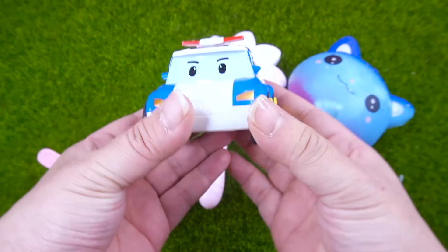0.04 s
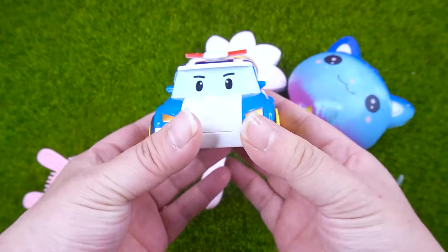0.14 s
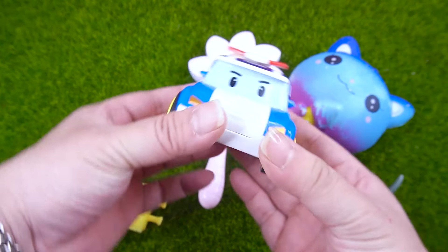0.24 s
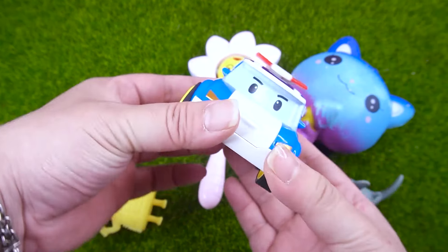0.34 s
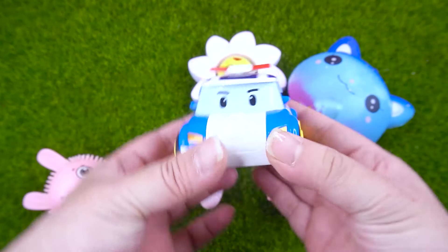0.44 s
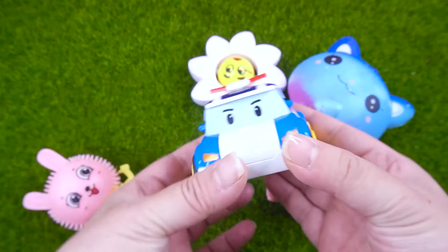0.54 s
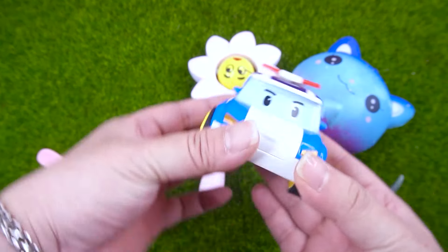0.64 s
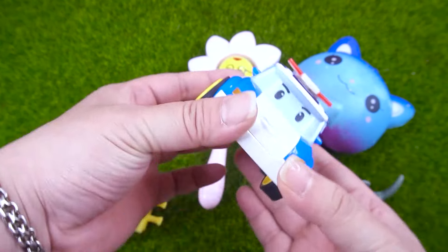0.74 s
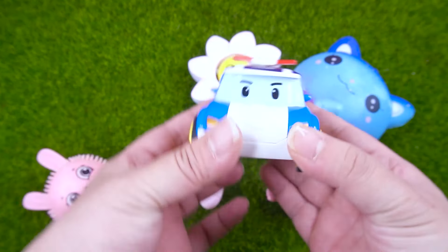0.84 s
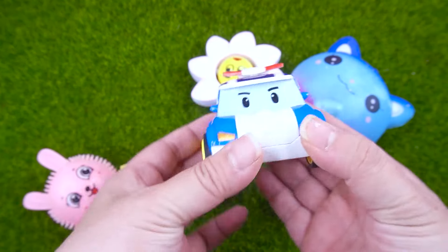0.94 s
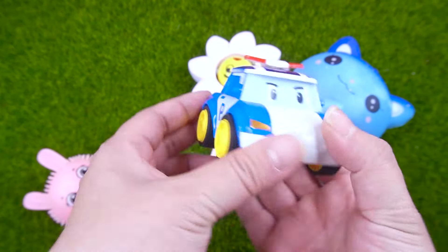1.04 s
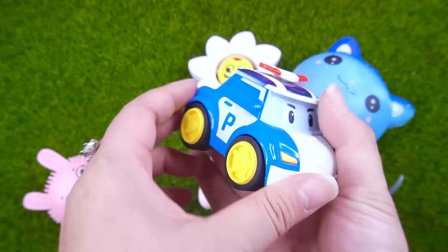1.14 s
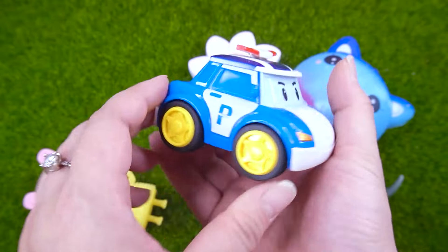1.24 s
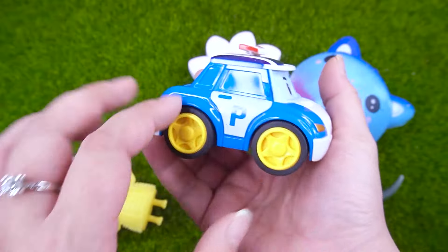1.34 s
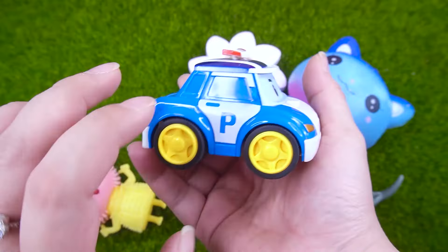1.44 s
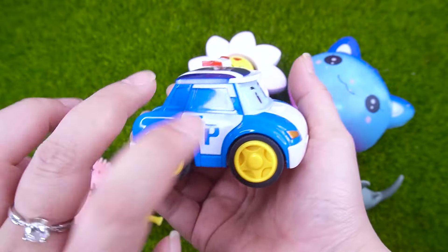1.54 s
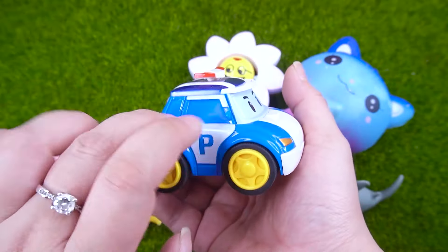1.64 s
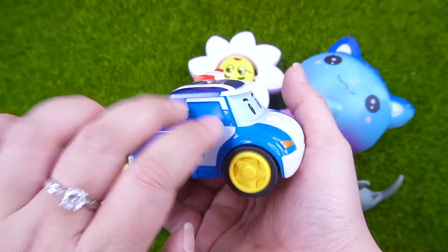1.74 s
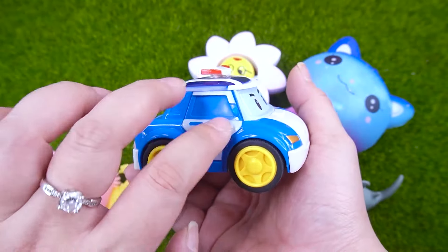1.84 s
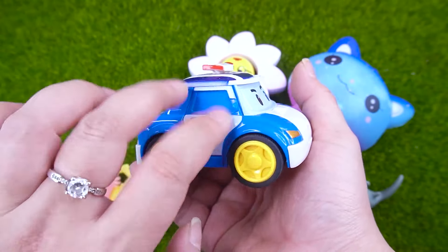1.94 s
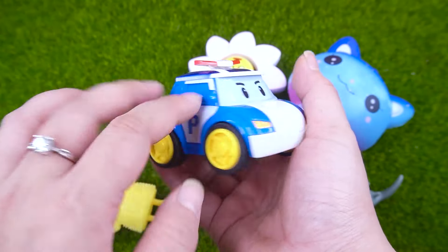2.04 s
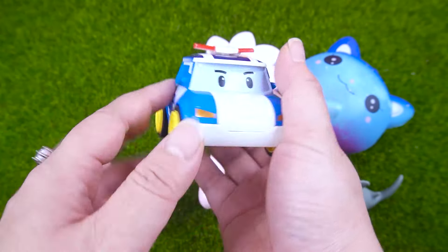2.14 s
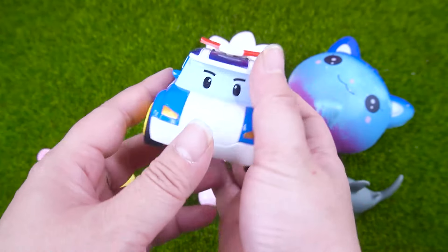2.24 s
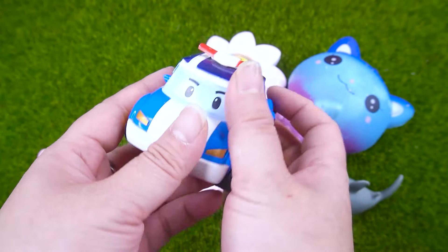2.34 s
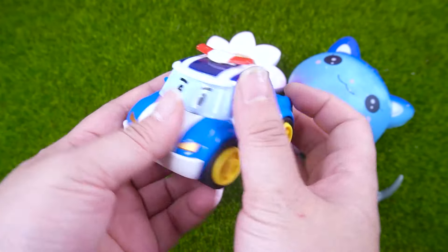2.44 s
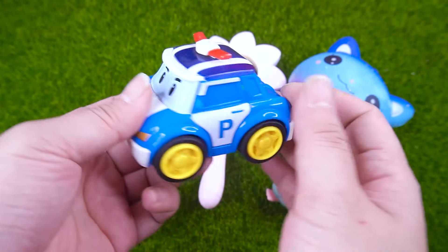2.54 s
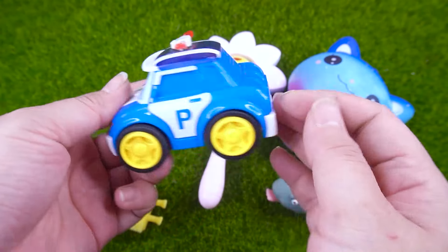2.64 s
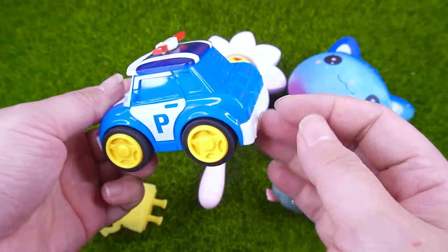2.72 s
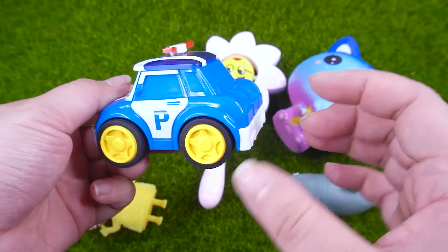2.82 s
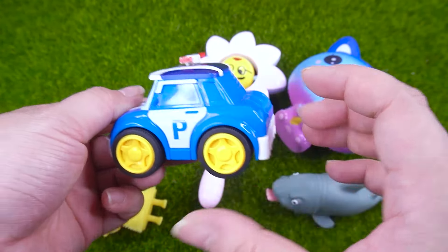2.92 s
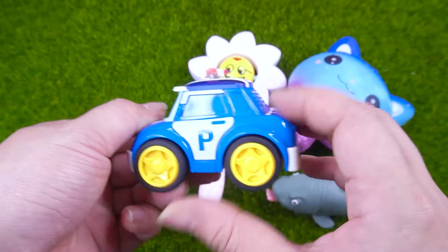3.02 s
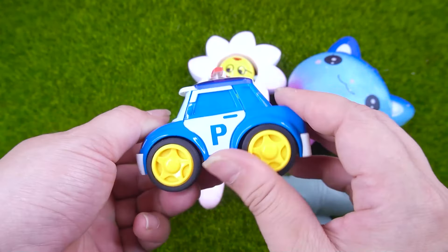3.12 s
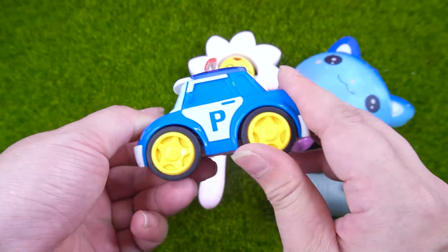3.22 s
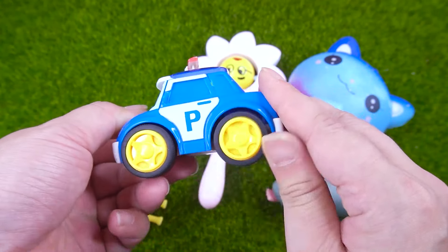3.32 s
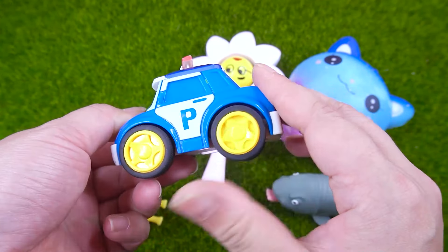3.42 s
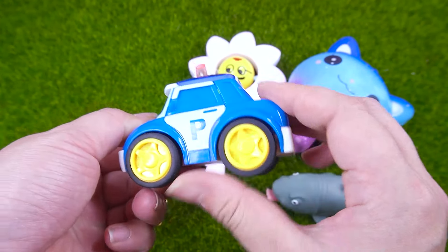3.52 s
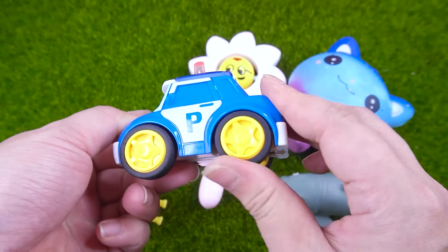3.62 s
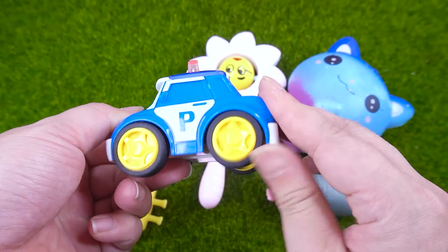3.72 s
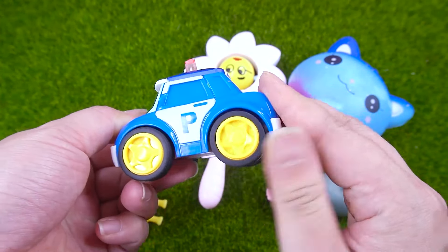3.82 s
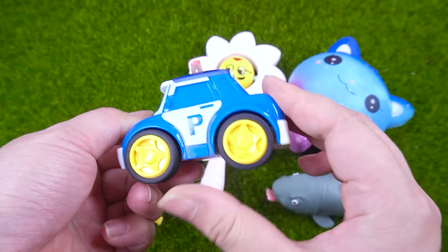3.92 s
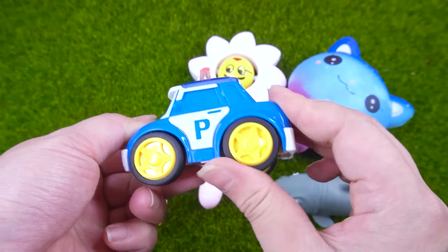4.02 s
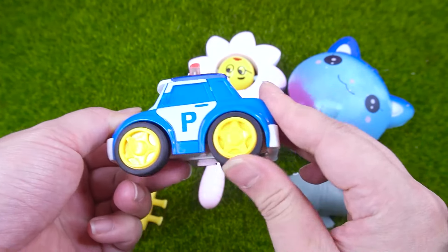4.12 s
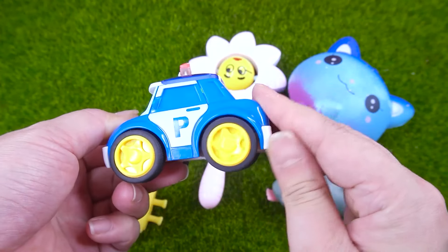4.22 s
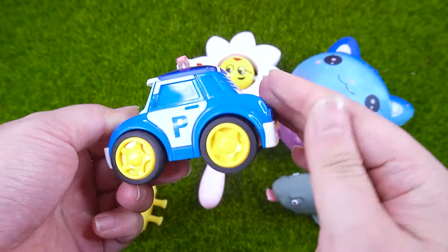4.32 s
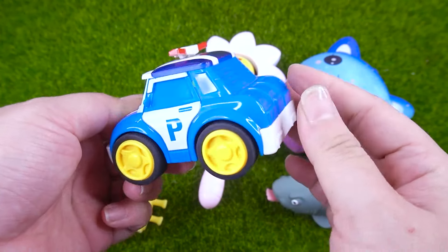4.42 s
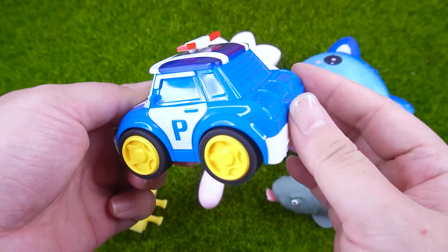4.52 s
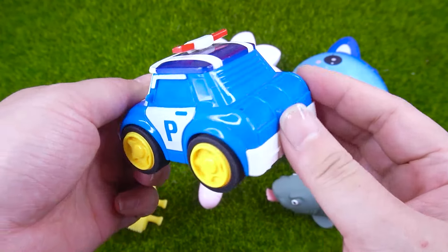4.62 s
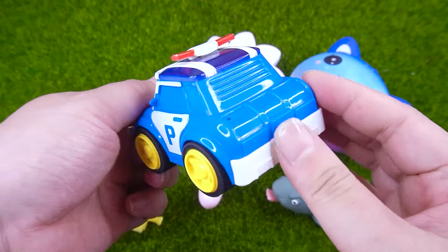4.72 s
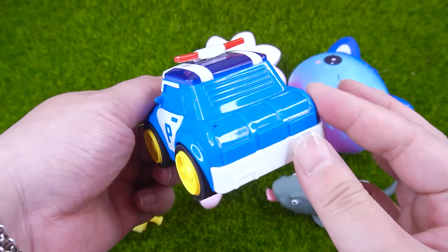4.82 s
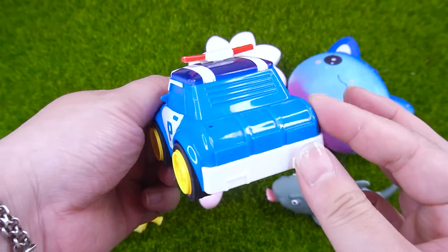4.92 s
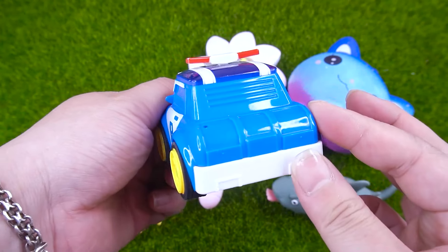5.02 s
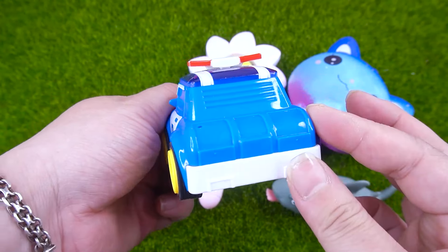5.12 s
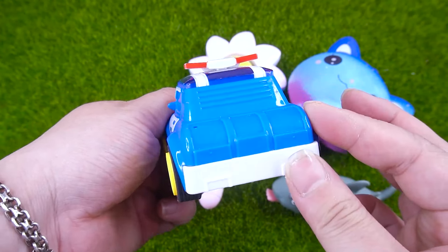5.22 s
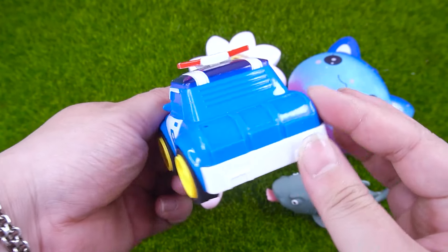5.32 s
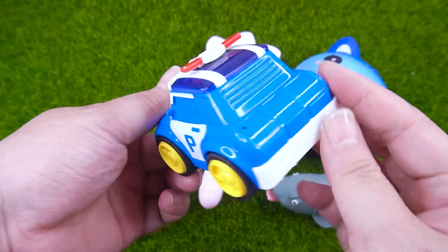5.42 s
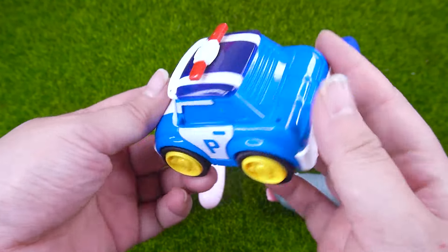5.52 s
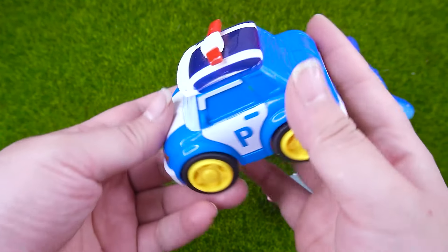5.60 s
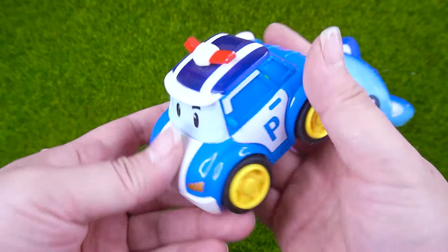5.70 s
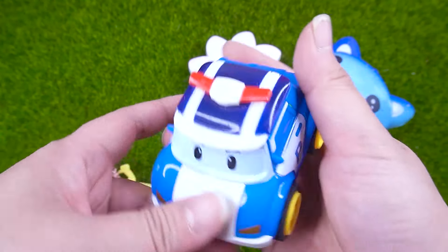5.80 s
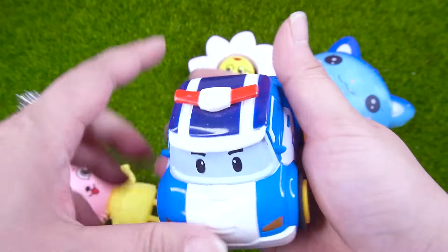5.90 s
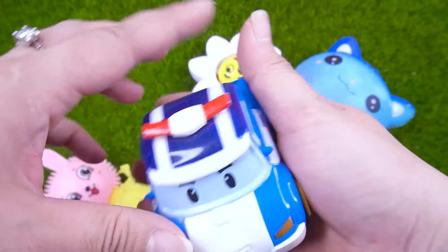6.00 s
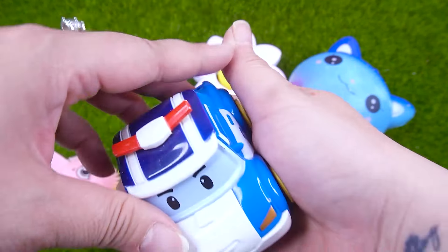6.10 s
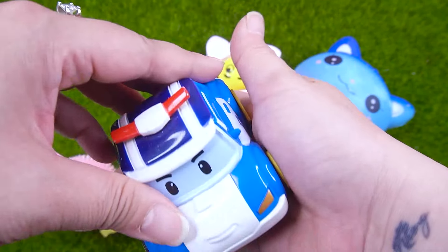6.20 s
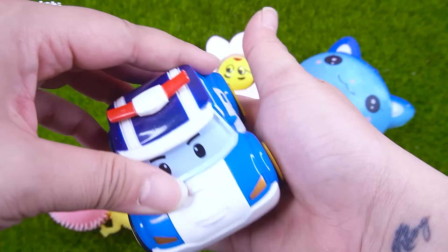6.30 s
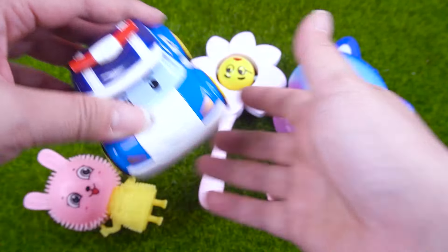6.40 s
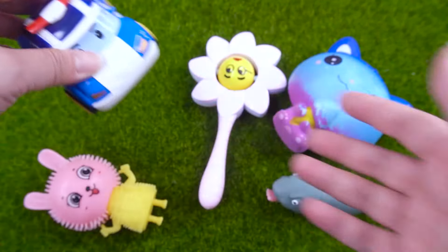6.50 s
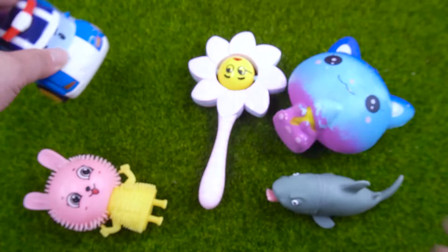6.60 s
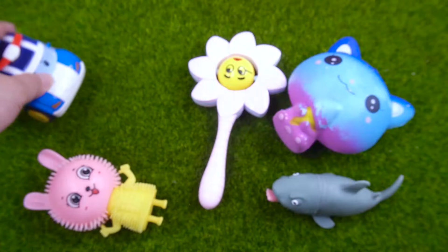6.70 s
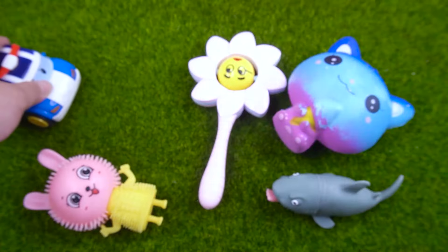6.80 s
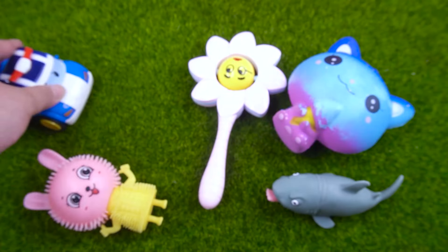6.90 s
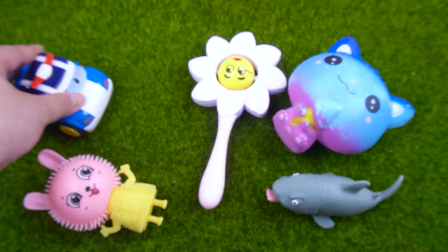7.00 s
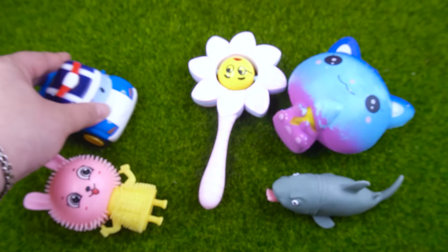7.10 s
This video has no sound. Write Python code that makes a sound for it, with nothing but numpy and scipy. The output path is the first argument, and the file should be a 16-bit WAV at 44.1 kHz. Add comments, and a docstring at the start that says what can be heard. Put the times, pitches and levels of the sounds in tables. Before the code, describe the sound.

A plastic toy car is handled with hollow clicks and taps, then its gears rattle and whir as a wheel is spun by thumb.

```python
"""A hollow plastic toy car is turned in two hands close to a stereo microphone in a small room. First skin
rustles on it, loose parts knock and fingernails tap the roof, each impact exciting the modes of the shell,
while the hands thud softly. From 3.2 s a thumb spins a wheel three times: the gear teeth rattle and hum,
the flywheel pinion whines and the thumb snaps off the tyre. The gears run down, plastic squeaks, and near
6.8 s the car is set on a mat and pushed. Throughout, the loudest knocks overload the recorder."""
import sys
import numpy as np
from scipy import signal
from scipy.io import wavfile
from scipy.ndimage import uniform_filter1d

SR = 44100
rng = np.random.default_rng(int(sys.argv[2]) if len(sys.argv) > 2 else 0)


def dump_mix(stems):
    """Bounce the given channels to the path in sys.argv[1] as a 16-bit WAV at rate SR."""
    frames = np.atleast_2d(stems).T  # one column per channel
    limited = np.clip(frames, -1, 1)  # hard clip at full scale
    pcm = np.round(limited * 32767).astype(np.int16)
    wavfile.write(sys.argv[1], SR, pcm)


N = 315315


def amp(db):
    """Amplitude ratio of a level in dB."""
    return 10 ** (np.asarray(db) / 20)


def unit_rms(x):
    """Normalisation to an rms of 1."""
    return x / np.sqrt(np.mean(x ** 2) + 1e-20)


def slow_noise(shape, span):
    """Random fluctuation: white noise averaged over span samples, at unit rms."""
    return unit_rms(uniform_filter1d(rng.standard_normal(shape), span))


def at_frequency(points, hz):
    """Interpolation on a logarithmic frequency axis."""
    known_hz, value = np.transpose(points)
    return np.interp(np.log(hz + 1), np.log(known_hz + 1), value)


def envelope(segments, column, outside=-200):
    """Linear interpolation in time of one column, constant outside the segments."""
    t, out = np.arange(N) / SR, np.full(N, float(outside))
    for rows in map(np.array, segments):
        inside = (t >= rows[0, 0]) & (t <= rows[-1, 0])
        out[inside] = np.interp(t[inside], rows[:, 0], rows[:, column])
    return out


def impulse_response(spectrum, size=2048):
    """Minimum-phase response of unit energy: phase follows from log gain by the Hilbert transform."""
    hz = abs(np.fft.fftfreq(size, 1 / SR))
    log_gain = np.log(amp(np.maximum(at_frequency(spectrum, hz), -100)))
    taps = np.fft.ifft(np.exp(np.conj(signal.hilbert(log_gain)))).real[:size // 2]
    return taps / np.linalg.norm(taps)


def three_bands(x, bass_hz=700, treble_hz=2450):
    """Crossover filtering into bass, body and treble."""
    bands = (bass_hz, "low"), ((bass_hz, treble_hz), "band"), (treble_hz, "high")
    return [signal.sosfilt(signal.butter(4, *band, fs=SR, output="sos"), x) for band in bands]


def lowpass(x, hz):
    """Second-order roll-off of the treble."""
    return signal.sosfilt(signal.butter(2, np.clip(hz, 2000, 20000), fs=SR, output="sos"), x)


# Modes of the shell. Each row: frequency in Hz, level in dB, decay time T60 in seconds.
SHELL_MODES = [(990, -65.5, 0.017), (1040, -61, 0.014), (1290, -29.5, 0.015), (1410, -35.5, 0.084),
               (1434, -1, 0.13), (1573, 4, 0.035), (1850, -18.5, 0.022), (1810, 6, 0.0088),
               (1970, -20, 0.0052), (3310, -10, 0.017), (3200, -5.5, 0.09), (3760, 2.5, 0.011),
               (3660, -5, 0.0067), (3975, 8.5, 0.016), (4330, 4.5, 0.013), (4620, 12, 0.0047),
               (5390, -9.5, 0.013), (5750, -12.5, 0.0013), (7300, 8, 0.0034)]
# The non-resonant click of a contact. Each row: frequency in Hz, spectral density in dB.
CLICK_SPECTRUM = [(88, -37), (150, -23), (777, -16.5), (1510, 5.5), (2150, -14), (2780, -15.5),
                  (3060, -25.5), (3450, -11.5), (3870, -20), (6840, -11.5), (7840, -31), (10900, -38),
                  (15000, -15), (16200, -85.5)]
def shell_responses(count, spread_db, detune, click_db, favoured_hz=1., favour_db=0):
    """Modal superposition: each of count struck spots weights the damped modes differently."""
    hz, db, t60 = np.transpose(SHELL_MODES)[:, :, None]
    t = np.arange(1024) / SR
    scatter = rng.standard_normal((count, 2, len(SHELL_MODES), 1))
    nearness = np.exp(-(np.log(hz / np.reshape(favoured_hz, (-1, 1, 1))) / 0.02) ** 2)
    db = db + spread_db * scatter[:, 0] + favour_db * nearness
    hz = hz * (1 + detune * scatter[:, 1])
    ring = (amp(db - 60 * t / t60) * np.sin(2 * np.pi * hz * t)).sum(1)
    click = amp(click_db) * impulse_response(CLICK_SPECTRUM)
    return ring / np.linalg.norm(ring, axis=1, keepdims=True) + click


def patter(per_s, uneven_db, spots):
    """Shot noise: random impacts, a few much harder, ring the shell. Gives body and treble at unit rms."""
    hits = (rng.random(N) < per_s / SR) * amp(uneven_db * np.minimum(rng.exponential(1, N), 4))
    struck = (rng.integers(0, 4, N) + np.arange(N) * 15 // SR) % len(spots)  # the busy spots drift
    ring = sum(signal.oaconvolve(hits * (struck == k), spot)[:N] for k, spot in enumerate(spots))
    bass, body, treble = three_bands(ring)
    return unit_rms(amp(-7) * bass + body), unit_rms(treble)


# Two spells of handling. Each row: time in seconds, body level in dB, treble level in dB.
RUSTLE_LEVELS = [
    [(0.0, -51.5, -66), (0.25, -49, -64), (0.4, -56, -72), (0.75, -54.5, -58), (1.04, -57, -60.5),
     (1.2, -36, -42), (1.29, -44.5, -64), (1.45, -53.5, -92), (1.62, -58.5, -60), (1.64, -14, -20),
     (1.75, -35, -40), (1.8, -26.5, -29.5), (1.98, -30.5, -41), (2.12, -33.5, -48), (2.28, -43, -57),
     (2.72, -42, -49.5), (2.88, -57.5, -77), (3.18, -50, -52)],
    [(5.79, -38, -51), (5.99, -42, -50), (6.09, -37.5, -48), (6.28, -46, -60), (6.36, -40, -51),
     (6.57, -56, -66.5), (6.83, -55, -66.5), (6.91, -34, -47)],
]
def rustle():
    """Friction noise: skin and loose parts make dense, faint, soft contacts with the shell."""
    spots = shell_responses(count=10, spread_db=1.5, detune=0.067, click_db=0.5)
    body, treble = patter(per_s=2500, uneven_db=4.3, spots=spots)
    body_db, treble_db = (envelope(RUSTLE_LEVELS, column) for column in (1, 2))
    return amp(body_db) * body + amp(treble_db) * lowpass(treble, 8400)


# Impacts of nails, loose parts and slapping gears. Each row: start in seconds, level in dB, treble and
# bass against the body in dB, frequency favoured by the spot in Hz, T60 of the contact in seconds.
IMPACTS = [(0.039, -41, -20, 0, 1640, 0.024), (0.107, -18, -12, -27, 1930, 0.039),
           (0.139, -18, -14, -19, 1550, 0.019), (0.15, -12.5, -18, -24.5, 1540, 0.049),
           (0.191, -17, -5, -49, 1340, 0.019), (0.432, -22, 0.5, -23, 1440, 0.016),
           (0.463, -38, -7, -29, 1850, 0.022), (0.542, -32.5, -2, 2, 1260, 0.017),
           (0.695, -29, -1, -18, 1230, 0.034), (0.721, -27.5, -2.5, -15, 1420, 0.013),
           (0.765, -32, -27, -7, 1410, 0.034), (0.813, -28.5, -8, -16, 1450, 0.026),
           (0.922, -31.5, -4, -4, 1110, 0.046), (0.957, -33, -18, -3, 1810, 0.024),
           (0.993, -33, -35, -14, 1480, 0.019), (1.066, -21, -10, -45, 1540, 0.0079),
           (1.111, -20, -15, -15, 1550, 0.059), (1.145, -6, -13.5, -28, 1410, 0.018),
           (1.175, -27.5, -20, -32, 1450, 0.025), (1.198, -45, -27, -28, 1350, 0.022),
           (1.223, -30, -32, -10, 1380, 0.017), (1.276, -22, -29, -16, 1420, 0.036),
           (1.337, -20, -15.5, -22, 1520, 0.02), (1.392, -24, 11, -22, 1570, 0.019),
           (1.625, 2.5, -3.5, -19.5, 1580, 0.03), (1.681, 3.5, -5, -17.5, 1500, 0.032),
           (1.762, 5, -3, -31, 1420, 0.014), (1.814, 4.5, -5, -12, 1290, 0.022),
           (1.876, 1.5, 2, -20.5, 1310, 0.023), (1.933, 3.5, -7, -20, 1250, 0.034),
           (2.007, 1, -11, -27, 1620, 0.024), (2.066, 0, -8.5, -23, 1257, 0.053),
           (2.121, -11.5, -3.5, -20, 1310, 0.022), (2.28, -24.5, -8, -10, 1310, 0.018),
           (2.364, -19, -16, -15, 1400, 0.037), (2.427, -5, -7.5, -24, 1410, 0.013),
           (2.493, -17, -16, -23, 1360, 0.036), (2.522, -11, -20, -24, 1660, 0.016),
           (2.572, -19, -14.5, -18, 1490, 0.03), (2.647, -15.5, -15, -26, 1780, 0.021),
           (2.744, -24, -14, -26, 1500, 0.033), (2.758, -16, -11.5, -15.5, 1480, 0.023),
           (2.792, -14, 6, -30, 1420, 0.019), (3.094, -17, -8, -14, 1360, 0.057),
           (3.113, -2, -1.5, -21, 1580, 0.03), (3.147, -7, 3, -24, 1570, 0.017),
           (3.163, -5.5, -1, -26, 1420, 0.036), (3.201, -7.5, -4, -37, 1390, 0.014),
           (3.216, -6.5, -14, -35, 1770, 0.01), (3.228, -5, -14, -39, 1680, 0.02),
           (3.242, -11, -14, -30, 1500, 0.027), (3.262, -5.5, -17, -37, 1390, 0.029),
           (3.285, -4, -31, -39, 1530, 0.062), (3.313, 3.5, -28, -34, 1550, 0.011),
           (3.349, -3, -25, -22, 1480, 0.011), (3.391, -0.5, -1, -11, 1620, 0.022),
           (3.416, 4, -2, -28, 1430, 0.014), (3.466, 2, 17, -30, 1510, 0.018),
           (3.539, 2, -1, -17, 1480, 0.019), (3.593, -1, -4, -34, 1430, 0.026),
           (3.807, 0, -7, -53, 1410, 0.025), (3.845, 0, -8, -41, 1440, 0.032),
           (3.951, -3, -28, -28, 1420, 0.034), (4.026, -0.5, 22, -15, 1360, 0.019),
           (4.043, 5, -4, -19, 1530, 0.022), (4.122, -4, -8, -38, 1560, 0.018),
           (4.138, -5, -14, -38, 1600, 0.027), (4.159, -2.5, -18, -37, 1520, 0.042),
           (4.19, -2, -34, -35, 1550, 0.032), (4.252, -1.5, -14, -27, 1410, 0.022),
           (4.34, -0.5, -17, -16, 1430, 0.02), (4.74, -19, -14, -29, 1590, 0.022),
           (4.829, -8.5, -8, -18, 1700, 0.04), (4.968, -7, -8, -19, 1620, 0.019),
           (5.021, -13, -19, -23, 1480, 0.024), (5.042, -8.5, -11, -17, 1600, 0.022),
           (5.12, -8, -1, -12, 1480, 0.018), (5.208, -9.5, -22, -13, 1310, 0.022),
           (5.23, -11, -4, -13, 1420, 0.012), (5.27, -10.5, -5, -25, 1420, 0.036),
           (5.301, -10, -5.5, -12.5, 1620, 0.025), (5.355, -6, -6.5, -21, 1340, 0.026),
           (5.384, -8.5, -9, -19, 1530, 0.029), (5.452, -4.5, -2.5, -14, 1830, 0.016),
           (5.483, -9.5, -10, -37, 1600, 0.039), (5.545, -6.5, -24, -37, 1560, 0.033),
           (5.587, -7, -21, -23, 1560, 0.018), (5.605, -7, -17, -35, 1480, 0.014),
           (5.67, -10, -20, -17, 1520, 0.043), (5.754, -9.5, -13, -32.5, 1480, 0.039),
           (5.789, -1, -11, -40, 1330, 0.024), (5.836, -7.5, -5, -22, 1440, 0.013),
           (5.948, -5, -14, -44, 1660, 0.026), (5.978, -20, -3, -31.5, 1460, 0.022),
           (6.005, -2.5, -14, -54, 1350, 0.024), (6.036, -19, -10, -43, 1550, 0.02),
           (6.16, -10, -17.5, -20.5, 1230, 0.025), (6.304, -25.5, -10.5, -39, 1470, 0.013),
           (6.33, -19, -5, -30.5, 1480, 0.019), (6.374, -9.5, -13, -17, 1408, 0.015),
           (6.448, -16.5, -20, -19.5, 1500, 0.044), (6.57, -29.5, 6, -28, 1600, 0.024),
           (6.775, -16, 1, -14, 1560, 0.022), (6.796, -1, -0.5, -32, 1720, 0.022),
           (6.827, -17.5, -5, -14, 1620, 0.028), (6.869, -9.5, -7.5, -14.5, 1100, 0.039),
           (6.886, -27, -10, -32, 1560, 0.025), (6.931, -13, -4, -36, 1410, 0.025),
           (6.947, -11, -12, -42, 1410, 0.018), (6.976, -11, -23, -38, 1430, 0.022),
           (6.987, -10, -17, -36, 1420, 0.017), (7.006, -7.5, -11, -40, 1450, 0.027),
           (7.058, -10.5, -27, -37, 1410, 0.029), (7.098, -16, -14, -38, 1370, 0.024)]
def knocks(rise_s=0.001194, first_jolt=2.05):
    """Impact excitation: a burst of jolts swells and dies, driving the shell's modes at one spot."""
    out, t = np.zeros(N + 4096), np.arange(2048) / SR
    spots = shell_responses(count=len(IMPACTS), spread_db=2.5, detune=0.022, click_db=-0.5,
                            favoured_hz=np.transpose(IMPACTS)[4], favour_db=11)
    chatter = rng.standard_normal((len(IMPACTS), len(t)))
    chatter *= amp(3 * slow_noise(chatter.shape, span=100))
    for (start, db, treble_db, bass_db, _, t60), spot, jolts in zip(IMPACTS, spots, chatter):
        force = jolts * amp(-60 * t / t60) * (1 - np.exp(-t / rise_s))
        force[round(rise_s * SR)] += first_jolt
        ring = lowpass(signal.fftconvolve(force, spot), 26300 * amp(0.52 * db))  # harder is brighter
        bass, body, treble = map(unit_rms, three_bands(ring))
        knock = amp(bass_db) * bass + body + amp(treble_db) * treble
        at = round(start * SR)
        out[at:at + len(knock)] += amp(db) * knock / abs(knock).max()
    return out[:N]


# Bumps of the hands and the mat. Each row: start in seconds, level in dB, T60 in seconds.
BUMPS = [(1.093, -69, 0.4), (1.299, -65, 0.4), (1.629, -43, 0.4), (1.679, -52, 0.4), (1.759, -47, 0.4),
         (1.819, -53, 0.4), (1.929, -53, 0.28), (2.009, -48, 0.62), (2.423, -56, 0.4), (2.697, -59, 0.4),
         (2.829, -57, 0.6), (3.099, -42, 0.4), (3.259, -43, 0.4), (3.603, -46, 0.37), (3.799, -40, 0.4),
         (3.929, -40, 0.3), (4.059, -38, 0.31), (4.232, -36, 0.51), (4.819, -62, 0.4), (5.139, -47, 0.27),
         (5.69, -58, 0.4), (5.759, -61, 0.37), (6.08, -49, 0.4), (6.159, -54, 0.49), (6.369, -61, 0.4),
         (6.489, -58, 0.44), (6.639, -64, 0.4), (6.799, -36.5, 0.32), (6.838, -25, 0.32), (6.929, -38, 0.4),
         (6.999, -39.5, 0.44), (7.059, -39, 0.4), (7.109, -45, 0.4)]
# Their low noise. Each row: frequency in Hz, spectral density in dB.
THUD_SPECTRUM = [(15, -31), (25, -40), (65, -6.5), (103, -6.5), (171, -6.5), (236, -10.5), (300, -23.5),
                 (390, -55), (660, -120)]
def thuds(rise_s=0.011, floor_db=-86.5, rumble_db=-42):
    """Incoherent addition: decaying bumps, gear rumble and a faint floor sum in power as low noise."""
    white = rng.standard_normal(N)
    noise = unit_rms(signal.oaconvolve(white, impulse_response(THUD_SPECTRUM, size=8192))[:N])
    start, db, t60 = np.transpose(BUMPS)[:, :, None]
    t = np.arange(0, N + 64, 64) / SR
    age = np.maximum(t - start, 0)
    bumps = amp(db - 60 * age / t60) * (1 - np.exp(-age / rise_s))
    bump_power = np.interp(np.arange(N) / SR, t, (bumps ** 2).sum(0))
    rumble_power = amp(gear_db(column=1) + rumble_db) ** 2
    return np.sqrt(bump_power + amp(floor_db) ** 2 + rumble_power) * noise


# Gear noise of the spun wheel, then of the pushed car. Each row: time in seconds, then the levels of
# body, treble and axle hiss in dB.
GEAR_LEVELS = [
    [(3.19, -49, -37.5, -85), (3.26, -25, -26.5, -64), (3.31, -16, -22, -57), (3.4, -20.5, -18, -43),
     (3.58, -16.5, -16, -40), (3.64, -20, -25.5, -36), (3.73, -14, -22, -43), (3.8, -17, -15.5, -26),
     (3.91, -21, -16, -34), (4.04, -19.5, -17.5, -27), (4.1, -21.5, -23.5, -47), (4.17, -19.5, -27.5, -37),
     (4.24, -15.5, -16.5, -32), (4.32, -16, -13, -31), (4.44, -19, -16, -33), (4.74, -17, -25, -39),
     (4.9, -26, -29, -46), (5.3, -26.5, -32, -51), (5.62, -29.5, -32, -61), (5.8, -33.5, -50, -71)],
    [(6.9, -42, -48, -90), (6.936, -25, -31, -80), (7.0, -24, -29.5, -69), (7.15, -21.5, -25.5, -68)],
]
# Catches of the slowing gears. Each row: time in seconds, change of level in dB.
GEAR_CATCHES = [(4.82, 0.5), (4.97, 5), (5.04, 8), (5.128, 7.5), (5.232, 11), (5.37, -2), (5.461, -14),
                (5.549, 4.5), (5.592, 5.5), (5.698, 14), (5.792, 9)]
def gear_db(column, catch_s=0.0099):
    """Amplitude modulation: the level of one band of gear noise swells or dips briefly at each catch."""
    t = np.arange(N) / SR
    catches = sum(db * np.exp(-((t - centre) / catch_s) ** 2 / 2) for centre, db in GEAR_CATCHES)
    return envelope(GEAR_LEVELS, column) + catches


# Thin hiss of the axle. Each row: frequency in Hz, spectral density in dB.
AXLE_SPECTRUM = [(11000, -38), (12500, -22), (13300, 3.5), (14400, -6), (15500, 0), (16500, -29.5)]
def gear_rattle():
    """Backlash: loose teeth slap unevenly, over the finer whir of the flywheel pinion and axle hiss."""
    spots = shell_responses(count=12, spread_db=4, detune=0.02, click_db=-8)
    slaps = patter(per_s=600, uneven_db=6.2, spots=spots)
    whir = patter(per_s=3000, uneven_db=0.68, spots=spots)
    body, treble = (unit_rms(coarse + amp(2) * fine) for coarse, fine in zip(slaps, whir))
    flutter = amp(3 * slow_noise(N, span=300))
    hiss = unit_rms(signal.oaconvolve(rng.standard_normal(N) * flutter, impulse_response(AXLE_SPECTRUM))[:N])
    rattle = amp(gear_db(column=1)) * body + amp(gear_db(column=2)) * treble
    return rattle + amp(envelope(GEAR_LEVELS, column=3)) * hiss


def glides(rows, curve, ends_db, skew=1):
    """Frequency and gain of gliding tones, faint at both ends; a skew above 1 delays the crest."""
    t, hz, gain = np.arange(N) / SR, np.full(N, 100.), np.zeros(N)
    for start, length, first_hz, target_hz, db in rows:
        inside = (t >= start) & (t < start + length)
        progress = (t[inside] - start) / length
        hz[inside] = first_hz + (target_hz - first_hz) * curve(progress)
        gain[inside] = amp(db + ends_db * (2 * progress ** skew - 1) ** 4)
    return hz, gain


def wavering_cycles(hz, share):
    """Phase in cycles: the integral of a frequency that wavers by a share of itself."""
    return np.cumsum(hz * (1 + share * slow_noise(N, span=300))) / SR


# Pushes of the thumb. Each row: start and length in seconds, first and target rate in teeth per
# second, level in dB.
THUMB_PUSHES = [(3.2, .16, 105, 335, -23), (3.62, .24, 190, 312, -23), (4.1, .2, 200, 295, -23)]
# Hum of the teeth. Each row: harmonic number, level in dB.
MESH_HARMONICS = [(1, -22), (2, -9), (3, -5), (4, -5), (5, 1)]
def gear_mesh():
    """Meshing under load: each tooth taps once, and a hum follows the rising tooth-passing frequency."""
    teeth_per_s, gain = glides(THUMB_PUSHES, lambda u: 1 - np.exp(-2 * u), ends_db=-14, skew=1.6)
    teeth = wavering_cycles(teeth_per_s, share=0.02)
    contacts = np.diff(np.floor(teeth), prepend=0)
    taps = contacts * amp(1.1 * rng.standard_normal(N)) * np.sqrt(SR / teeth_per_s)
    _, body, treble = three_bands(signal.oaconvolve(taps, impulse_response(CLICK_SPECTRUM))[:N])
    flutter = amp(4 * slow_noise(N, span=400))
    hum = flutter * sum(amp(db) * np.sin(2 * np.pi * k * teeth) for k, db in MESH_HARMONICS)
    return gain * (body + amp(-32) * treble + hum)


# One whine for each push. Each row: start and length in seconds, first and last pitch in Hz, level in dB.
WHINE_GLIDES = [(3.37, .22, 3140, 3115, -28), (3.76, .28, 3210, 2990, -28), (4.24, .26, 3040, 3150, -30)]
def pinion_whine():
    """Frequency modulation: the faint tone of the flywheel pinion wavers with its speed."""
    hz, gain = glides(WHINE_GLIDES, lambda u: u, ends_db=-17)
    return gain * np.sqrt(2) * np.sin(2 * np.pi * wavering_cycles(hz, share=0.017))


# Snaps at the tyre. Each row: start in seconds, level in dB, frequency in Hz, T60 in seconds.
TYRE_SNAPS = [(3.6233, 1.5, 14500, 0.018), (4.0525, -6, 14300, 0.016), (4.0613, 1, 14450, 0.0217),
              (4.0838, 2, 14100, 0.02)]
def tyre_snaps():
    """Release transients: as the thumb leaves the tyre, a very high, noisy ring decays exponentially."""
    out, t = np.zeros(N), np.arange(2048) / SR
    for start, db, hz, t60 in TYRE_SNAPS:
        wobble = slow_noise(len(t), span=30)
        at = round(start * SR)
        out[at:at + len(t)] += amp(db - 60 * t / t60) * wobble * np.sin(2 * np.pi * hz * t)
    return out


# Course of the squeak. Each row: time in seconds, pitch in Hz, level in dB.
SQUEAK_CONTOUR = [(5.914, 2520, -60), (5.92, 2390, -34), (5.932, 2480, -20.5), (5.94, 2540, -68)]
# Its timbre. Each row: harmonic number, level in dB.
SQUEAK_HARMONICS = [(1, -9), (2, -3), (3, -16)]
def squeak():
    """Stick-slip oscillation: plastic rubbing on plastic gives a short tone of three harmonics."""
    cycles = np.cumsum(envelope([SQUEAK_CONTOUR], column=1, outside=0)) / SR
    tone = sum(amp(db) * np.sin(2 * np.pi * k * cycles) for k, db in SQUEAK_HARMONICS)
    return amp(envelope([SQUEAK_CONTOUR], column=2)) * tone


# Decay of the small room. Each row: frequency in Hz, reverberation time T60 in seconds.
ROOM_DECAY = [(250, 0.93), (700, 0.62), (1700, 0.53), (4600, 0.5), (10000, 0.77), (14500, 0.47)]
def reverberation(x):
    """Diffuse reflection: sparse echoes of random sign reach each channel, each band at its own decay."""
    echoes = np.zeros((2, SR))
    at = np.arange(200, SR - 20, 20) + rng.integers(0, 20, (2, (SR - 201) // 20))
    np.put_along_axis(echoes, at, rng.choice([-1., 1.], at.shape), 1)
    hz, t, spectra = signal.stft(echoes, SR, nperseg=256)
    decay = amp(-60 * t / at_frequency(ROOM_DECAY, hz)[:, None])
    tail = signal.istft(spectra * decay, SR, nperseg=256)[1]
    tail[1] = 0.48 * tail[0] + 1.05 * tail[1]  # the channels are partly coherent
    tail /= np.linalg.norm(tail, axis=1, keepdims=True)
    return signal.fftconvolve(x[None], tail, axes=1)[:, :N]


def scene(bass_cut_hz=288, right_delay_s=40e-6):
    """Superposition of direct sound, reverberation and thuds, all reaching the right channel later."""
    car = knocks() + gear_rattle() + gear_mesh() + pinion_whine() + tyre_snaps() + squeak() + rustle()
    # The car's sounds carry little bass.
    car = signal.sosfilt(signal.butter(3, bass_cut_hz, "high", fs=SR, output="sos"), car)
    direct = car * amp([[0.15], [-0.15]])
    stereo = direct + amp(-8) * reverberation(lowpass(car, 10000)) + thuds()
    delays = np.sinc(np.arange(-32, 33) - np.array([[0], [right_delay_s * SR]])) * np.hanning(65)
    return signal.oaconvolve(stereo, delays, "same", axes=1)


def record(dry):
    """Overload distortion: peaks saturate near full scale, then a steep low-pass limits the band."""
    saturated = np.clip(dry, -0.99, 0.99)
    band_limit = signal.firwin(511, cutoff=15900, window=("kaiser", 9), fs=SR)
    return signal.oaconvolve(saturated, band_limit[None], "same", axes=1)


dry = scene()
out = record(dry)
dump_mix(out)
```